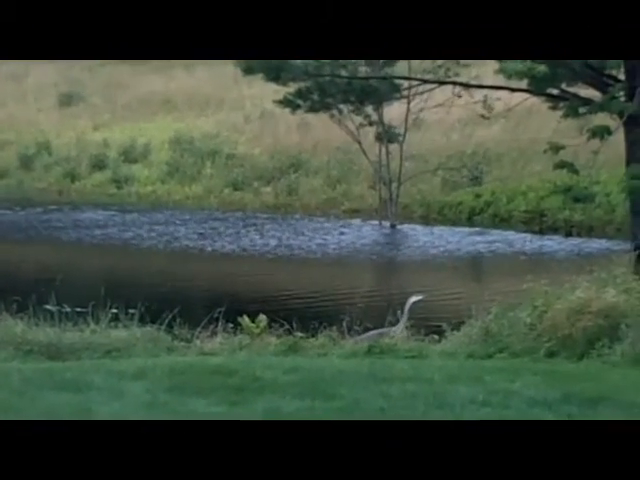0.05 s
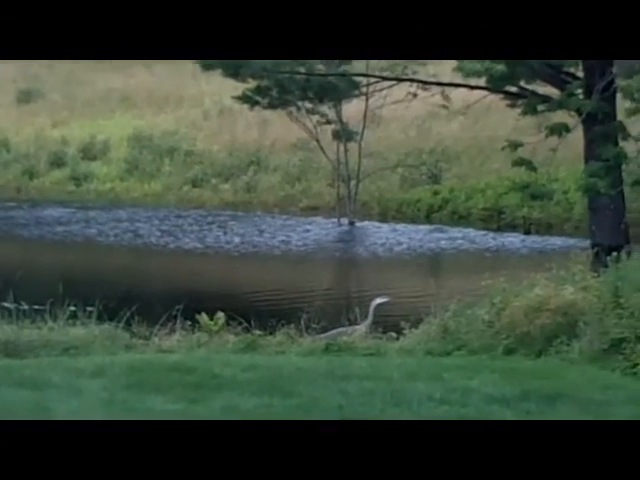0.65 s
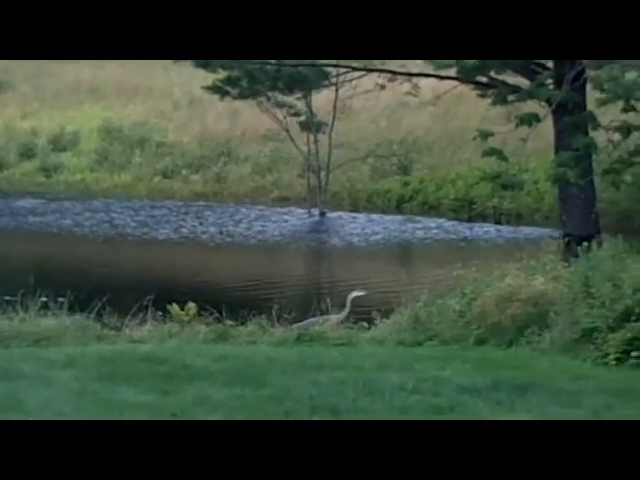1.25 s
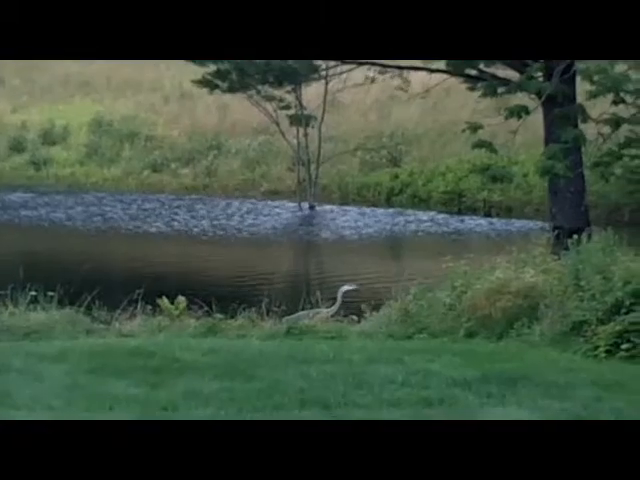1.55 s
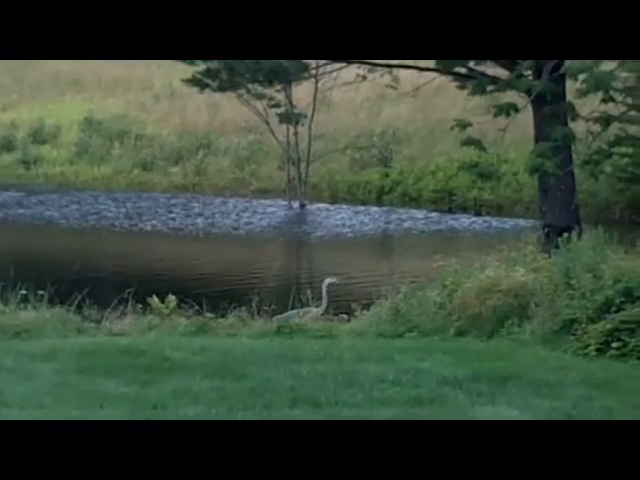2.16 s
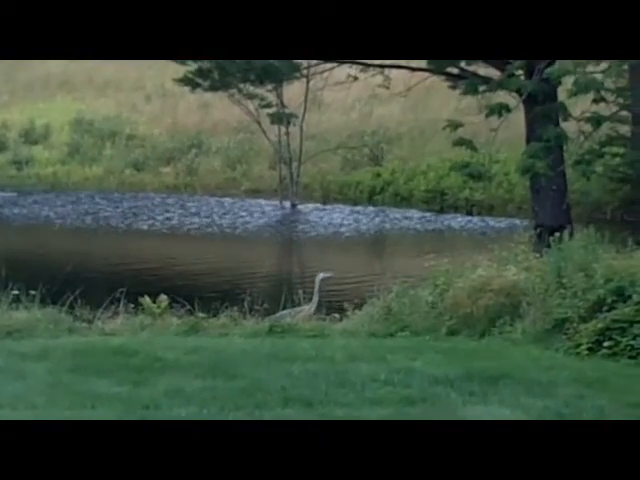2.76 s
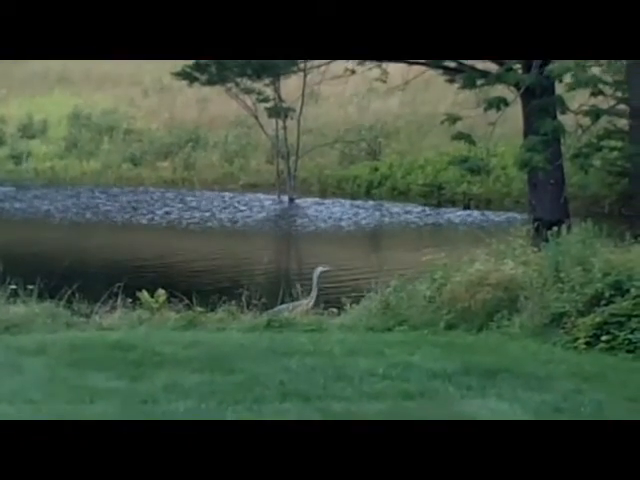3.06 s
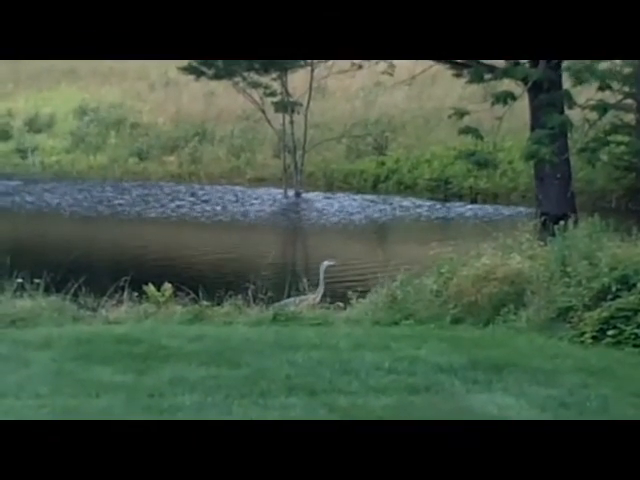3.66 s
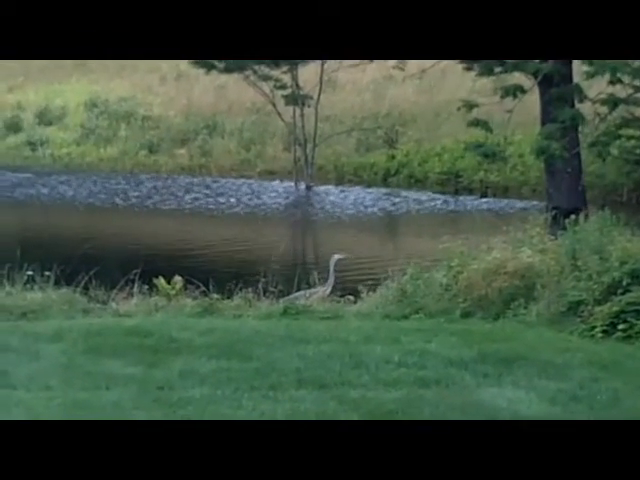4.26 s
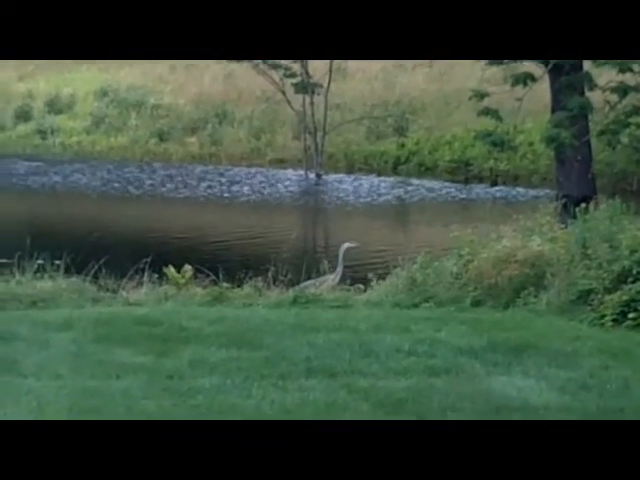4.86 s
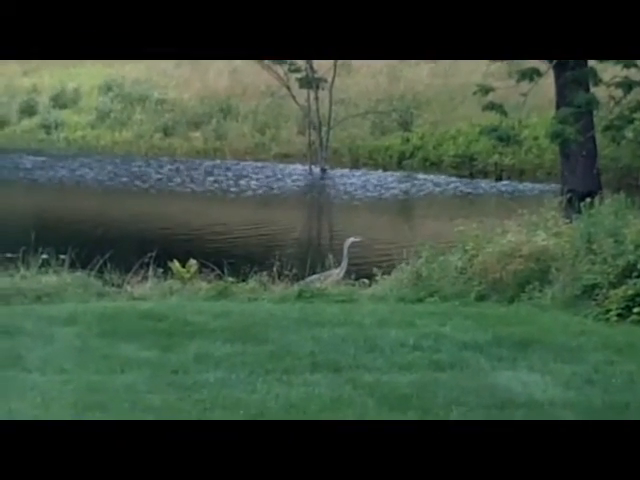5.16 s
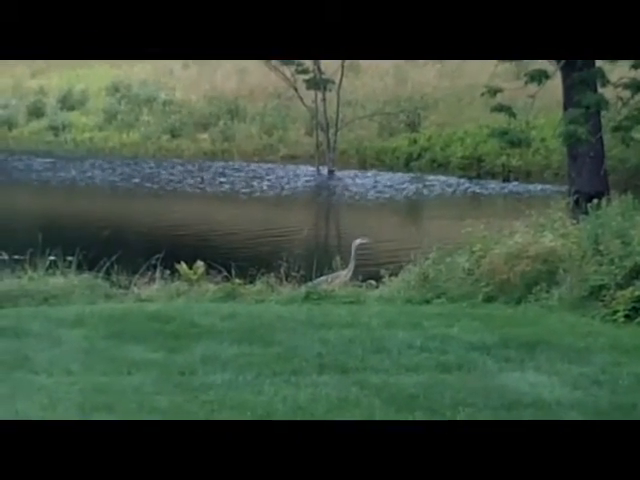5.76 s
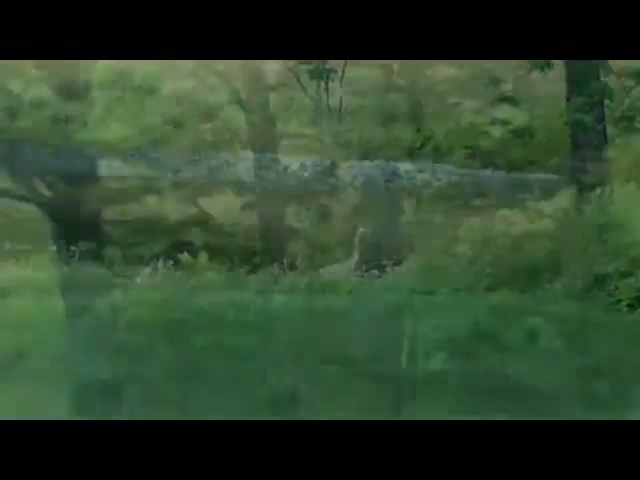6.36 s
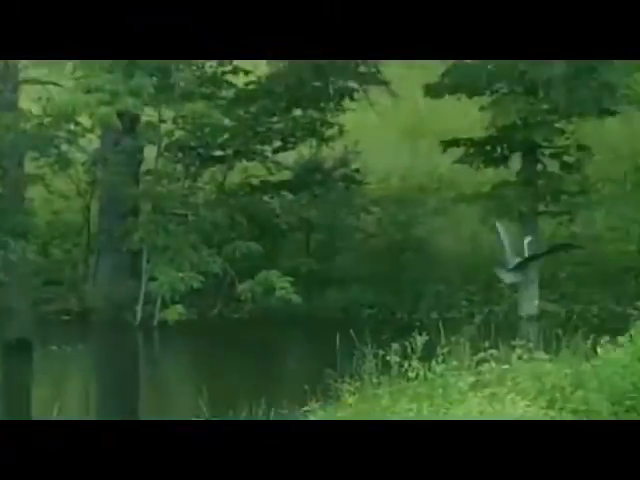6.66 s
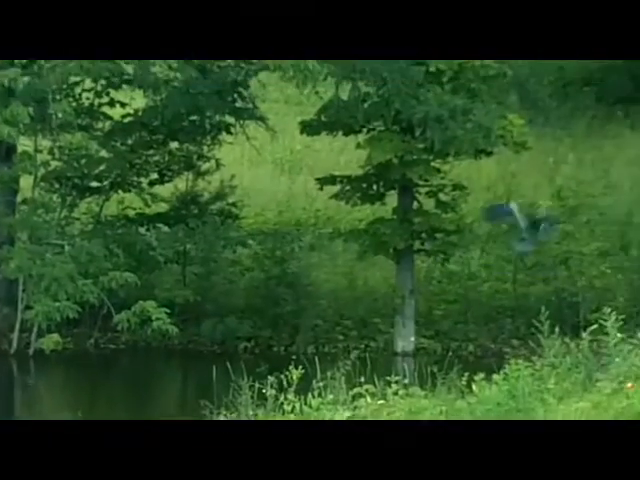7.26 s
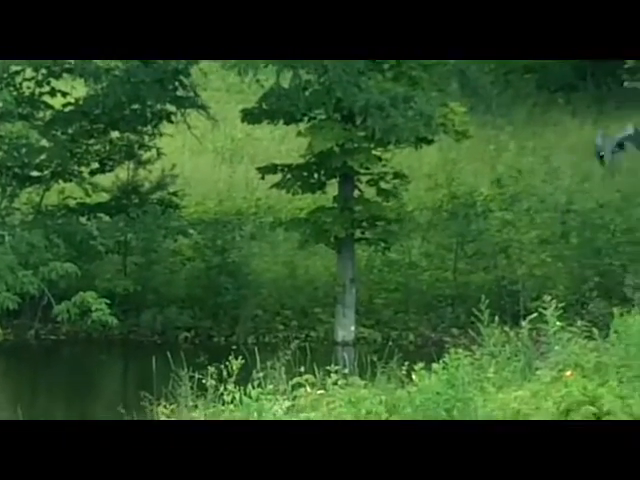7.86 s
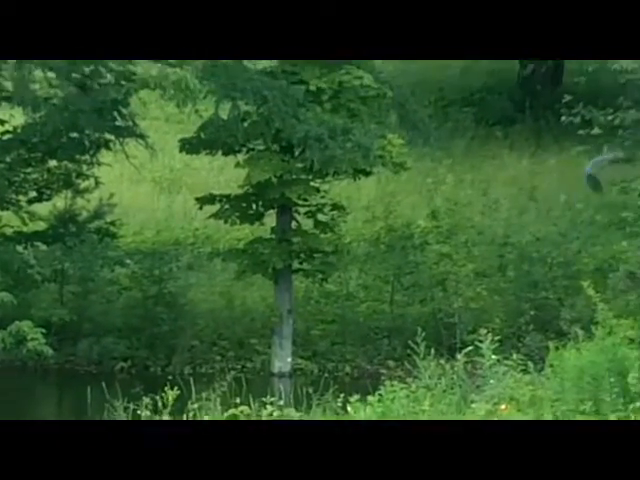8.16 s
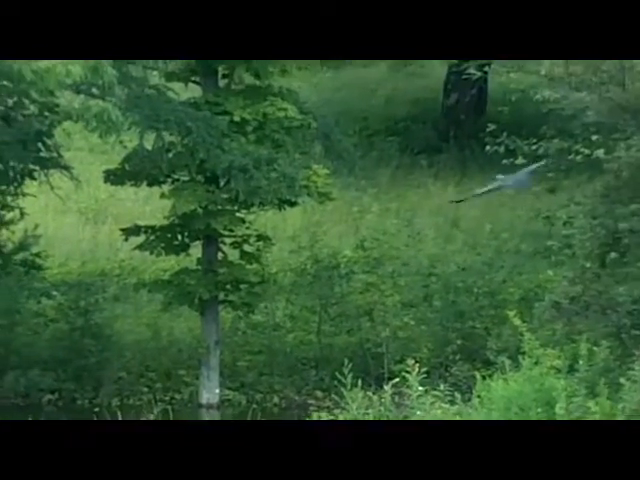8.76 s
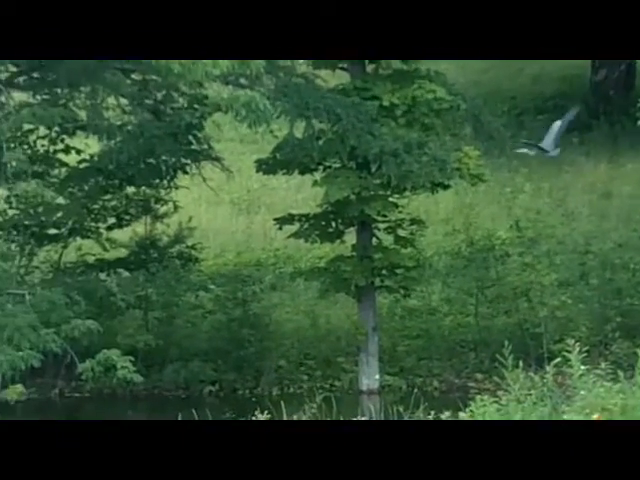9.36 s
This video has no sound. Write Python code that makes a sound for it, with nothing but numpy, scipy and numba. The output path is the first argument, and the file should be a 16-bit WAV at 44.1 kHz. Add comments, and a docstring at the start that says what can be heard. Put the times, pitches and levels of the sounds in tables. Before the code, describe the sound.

Soft outdoor hiss and the low hum of far traffic hang over a pond, with a thin camera whine underneath. A distant little bird sings one short, gliding phrase. Later the calm gives way to much louder wind buffeting the microphone. A hand bumps and knocks the camera, sharp clicks pop, and the hardest thumps briefly crackle and buzz, while a bird chirps faintly three times.

```python
"""Beside a pond, on a camera's microphone: quiet open air, a far road droning, and the camera's own faint whine
once per frame. Two seconds in, a small songbird whistles one phrase from the trees across the water. At 6.4 s a
second, windy scene comes in, overlapping the calm one for a moment. Wind rumbles right on the microphone and
handling adds thumps and knocks; the signal jumps in a few sharp clicks, and three faint falling chirps come
through the wind. On strong thumps the overloaded microphone crackles and buzzes; the heaviest make the limiter
duck."""
import sys
import numpy as np
from scipy import signal
from scipy.fft import rfft, irfft
from scipy.io import wavfile
from scipy.ndimage import uniform_filter1d, minimum_filter1d
from numba import njit

SR = 44100
rng = np.random.default_rng(int(sys.argv[2]) if len(sys.argv) > 2 else 0)


def to_wav(sig):
    """Store sig (one row per channel, or 1-D mono) as 16-bit WAV at the path in sys.argv[1].

    Samples outside -1..1 are clipped; the rate is SR.
    """
    pcm = np.clip(np.atleast_2d(sig), -1, 1) * 32767
    pcm = np.round(pcm).astype(np.int16)
    wavfile.write(sys.argv[1], SR, pcm.T)  # frames by channels


N = 415422
T = np.arange(N) / SR
WINDY_START_S, CALM_END_S = 6.428, 7.255
FRAME_HZ, WHINE_S = 29.97, .0075

# open air at the pond, and the microphone's hiss: (frequency [Hz], level [dB per Hz])
OPEN_AIR = [(20, -79.5), (65, -73), (130, -78), (250, -81), (400, -83.5), (600, -85.5), (950, -86.5),
            (1400, -92.5), (2200, -91.5), (4000, -91), (4850, -93), (5200, -108), (7000, -125)]
MIC_HISS = [(1000, -107), (5000, -107), (5500, -110), (6400, -107), (7300, -112), (8500, -117),
            (10000, -114.5), (11500, -113.5), (15000, -115.5)]
# the camera's whine: (pitch [Hz], level [dB])
WHINE_TONES = [(9500, -64.5), (14985, -68)]
# the frame clock in each scene: (holds from [s], start of one frame [s])
CALM_FRAMES = [(0, .0183)]
WINDY_FRAMES = [(0, .003), (8.2576, .015)]
# hum of the far road: (frequency [Hz], width [Hz], level [dB])
ROAD_HUM = [(169.2, 17.3, -67.5), (235.1, 16.7, -63), (393.2, 21, -65)]
# single far vehicles: (crest time [s], half length [s], pitch [Hz], level [dB])
VEHICLES = [(0.954, 0.269, 245.6, -52), (1.093, 0.75, 130.2, -58.5), (.9, 0.62, 215.3, -60.5),
            (2.242, 0.285, 248.8, -56), (2.5, 0.39, 222.1, -59), (2.504, 0.49, 309.6, -62.5),
            (2.997, 0.48, 254.4, -63), (3.244, 0.63, 108.9, -57)]
# wind on the microphone: (time [s], level [dB])
WIND_STRENGTH = [(6.44, -34), (6.52, -39.5), (6.56, -25), (6.72, -22), (6.9, -20), (7.02, -18.5),
                 (7.13, -27.5), (7.3, -27.5), (7.44, -25.5), (7.64, -29.5), (7.82, -22.5), (7.98, -27),
                 (8.22, -20), (8.46, -24), (8.87, -24), (9.02, -26), (9.18, -29.5), (9.42, -24.5)]
# colours of its large and small eddies: (frequency [Hz], relative level [dB])
WIND_RUMBLE = [(8, -14), (24, 8.5), (45, 6), (70, 1), (110, 0), (160, -13.5), (220, -33), (400, -53),
               (4000, -130)]
WIND_FLUTTER = [(90, -14), (160, 5), (240, -2), (330, -9), (450, -18), (700, -31), (1200, -52),
                (5000, -100)]
# short gusts that shake the camera: (crest time [s], half length [s], level [dB])
GUSTS = [(6.725, 0.034, -31), (7.031, 0.022, -37.5), (7.229, 0.0196, -34.5), (7.441, 0.00985, -28),
         (7.781, .014, -22.5), (8.036, 0.0067, -23.5), (8.195, 0.0254, -19.5), (8.239, 0.0169, -17.5),
         (8.293, 0.00385, -8), (8.34, 0.0416, -26.5), (8.894, 0.0468, -27.5), (9.256, 0.0092, -23)]
# soft thumps of the hand on the camera: (time [s], level [dB], half length [s])
HAND_THUMPS = [(6.745, -8.5, 0.00683), (6.887, -12, 0.00556), (7.821, -9, 0.0142), (8.106, -13.5, 0.008),
               (8.232, 1.5, 0.00516), (8.301, 2.5, 0.00395), (8.608, -13, 0.00452), (8.815, -10.5, 0.0058),
               (9.255, -12, 0.00506)]
# hard knocks on the case: (time [s], level [dB], roll-off of the contact [Hz])
CASE_KNOCKS = [(8.2275, -12, 478), (8.2976, -11.5, 1300), (9.256, -19.5, 448)]
# the case's resonances: (pitch [Hz], relative level [dB], half length [s])
CASE_MODES = [(242, 1.5, 0.00367), (426, -4.5, 0.00165), (779, 0, 0.0015)]
# brief dry crackles of the overloaded microphone on strong thumps: (time [s], level [dB])
OVERLOAD_TICKS = [(6.745, -42), (7.822, -40.5), (8.202, -45.5), (8.816, -45.5)]
# their colour: (frequency [Hz], relative level [dB])
TICK_COLOUR = [(300, -18), (700, 9.5), (2300, 7), (4800, -1.5), (6500, -45), (15000, -23.5)]
# buzz of the overloaded microphone: (frequency [Hz], width [Hz], relative level [dB])
BUZZ_BANDS = [(1700, 620, 1.5), (2260, 130, 6), (4740, 200, 4), (7180, 160, -15.5), (10370, 160, -16.5),
              (11960, 160, -9.5), (14400, 160, -14)]
# sharp jumps in the signal: (time [s], level [dB])
CLICKS = [(6.4283, -32), (6.6576, -13.5), (8.2576, -8.5)]
# notches in the microphone's response: (frequency [Hz], width [Hz])
MIC_NOTCHES = [(2720, 1154), (7850, 1930), (10900, 758)]
# the bird's syllables: (time into the syllable [s], pitch [Hz], relative level [dB])
DIP = [(0, 5235, -8), (.012, 4850, 0), (0.027, 4430, 5.5), (0.042, 4280, -1), (0.056, 4660, -1),
       (.068, 4898, 0), (.08, 4874, -10)]
ARCH = [(0, 3300, -20.5), (.015, 3850, -3.5), (0.027, 4350, 0.5), (0.039, 4600, -4.5), (.055, 4200, -3),
        (.07, 3800, -6), (0.089, 3300, -15)]
SWEEP = [(0, 2841, -7), (.03, 3083, -4.5), (.06, 3255, 1.5), (.078, 3420, -5), (.09, 3867, 2.5),
         (.1, 4270, 6), (.118, 5250, -12), (0.127, 4876, -3), (.145, 4894, -6.5)]
PEEP = [(0, 4828, -13), (.014, 4400, -5), (.024, 4360, -6), (.04, 4850, -17.5), (.055, 4880, -16.5)]
CHIP = [(0, 5132, -5), (.007, 4565, -5.5), (.016, 4150, -0.5), (.034, 3650, -2.5), (.06, 3140, -9.5)]
# the phrase from across the pond, and single chirps in the wind: (time [s], syllable, level [dB])
SONG = [(2.128, PEEP, -48), (2.217, ARCH, -52.5), (2.347, SWEEP, -53), (2.570, DIP, -52),
        (2.666, ARCH, -47.5), (2.803, SWEEP, -50), (3.017, DIP, -51), (3.112, ARCH, -45.5),
        (3.262, SWEEP, -54.5)]
CHIRPS = [(7.578, CHIP, -57.5), (7.704, CHIP, -58), (8.647, CHIP, -50.5)]


def undb(db):
    """Decibels to gain."""
    return 10 ** (np.asarray(db) / 20)


def unit(x):
    """Scale to rms 1."""
    return x / np.sqrt(np.mean(x ** 2))


def noise(points):
    """Noise with a spectrum of (frequency [Hz], level [dB per Hz]) points."""
    hz, db = np.transpose(points)
    f = np.maximum(np.fft.rfftfreq(N, 1 / SR), 1)
    colour = undb(np.interp(np.log(f), np.log(hz), db))
    return irfft(rfft(rng.standard_normal(N)) * colour, N) * np.sqrt(SR / 2)


def band(hz, width_hz):
    """Noise in one resonance with steep skirts, rms 1."""
    f = np.fft.rfftfreq(N, 1 / SR)
    return unit(irfft(rfft(rng.standard_normal(N)) / (1 + ((f - hz) / width_hz) ** 2) ** 2, N))


def walk(rate_hz):
    """Random values joined by straight lines; spread near 1."""
    steps = T * rate_hz
    count = int(steps[-1]) + 2
    return np.sqrt(3 / 2) * np.interp(steps, np.arange(count), rng.standard_normal(count))


def even(x, span_s):
    """Hold a noise near rms 1 over spans of the given length."""
    size = max(int(span_s * SR), 1)
    return x / np.sqrt(uniform_filter1d(uniform_filter1d(x ** 2, size), size) + 1e-12)


def swell(s, half_s):
    """A smooth rise and fall about a crest, height 1."""
    return np.exp(-np.minimum(((T - s) / half_s) ** 2, 50))


def open_air(level_db, sway_db=-0.28):
    """The quiet hiss of the outdoors, all round the microphone and barely swaying."""
    return noise(OPEN_AIR) * undb(level_db + sway_db * walk(0.51))


def camera_whine(frames, hiss_lift_db=4.0):
    """The camera's own noise: hiss, with a short burst of whine and extra hiss in every frame."""
    starts, offsets = np.transpose(frames)
    since_frame = (T - offsets[np.searchsorted(starts, T, "right") - 1]) % (1 / FRAME_HZ)
    burst = uniform_filter1d((since_frame < WHINE_S) * 1., size=50)
    whine = sum(undb(db) * np.sin(2 * np.pi * hz * T + .8 * walk(90)) for hz, db in WHINE_TONES)
    return noise(MIC_HISS) * undb(hiss_lift_db * burst) + burst * whine


def far_road(wander=0.00763, flutter_db=2.46, hum_sway_db=1.5, fade_db_per_s=0.36):
    """A far road hums and slowly fades; single vehicles swell over it in low, wandering tones."""
    traffic = sum(band(hz, width_hz) * undb(db + hum_sway_db * walk(2.826) - fade_db_per_s * T)
                  for hz, width_hz, db in ROAD_HUM)
    for s, half_s, hz, db in VEHICLES:
        phase = 2 * np.pi * np.cumsum(hz * (1 + wander * walk(6))) / SR
        traffic += np.sqrt(2) * np.sin(phase) * swell(s, half_s) * undb(db + flutter_db * walk(7.03))
    return traffic


def wind(rumble_db=-1, flutter_db=-36, flutter_growth=1.314, full_wind_db=-19, case_hz=151.72):
    """Large eddies rumble on the microphone, small ones flutter; gusts add flutter and shake the case."""
    strength_db = np.interp(T, *np.transpose(WIND_STRENGTH))
    eddies = walk(rate_hz=36)
    rumble = even(noise(WIND_RUMBLE), 0.067) * undb(strength_db + rumble_db + 3.0 * eddies)
    # as the wind rises, the flutter grows faster than the rumble
    flutter_gain = undb(flutter_db + flutter_growth * (strength_db - full_wind_db) - 0.5 * eddies)
    gusts = sum(undb(db) * swell(s, half_s) for s, half_s, db in GUSTS)
    flutter = even(noise(WIND_FLUTTER), 0.03) * np.hypot(flutter_gain, undb(-3) * gusts)
    shudder_hz = case_hz * (1 + .08 * walk(60))
    shudder = unit(np.sin(2 * np.pi * np.cumsum(shudder_hz) / SR))
    return rumble + flutter + undb(-2) * gusts * shudder


def hand_thumps(rebound=1.204):
    """The hand on the camera: each thump is one push of pressure with a shallow rebound either side."""
    return sum(undb(db) * swell(s, half_s) * (1 - rebound * ((T - s) / half_s) ** 2)
               for s, db, half_s in HAND_THUMPS)


def case_knocks():
    """A knock rings each mode of the case for a cycle or two; a softer contact loses the higher ones."""
    knocks = np.zeros(N)
    for s, db, rolloff_hz in CASE_KNOCKS:
        for hz, mode_db, half_s in CASE_MODES:
            gain = np.sqrt(2) * undb(db + mode_db) * np.exp(-(hz / rolloff_hz) ** 2)
            knocks += gain * swell(s, half_s) * np.sin(2 * np.pi * hz * (T - s))
    return knocks


def overload_ticks(half_s=0.00124):
    """Brief dry crackles of the overloaded microphone: bursts of noise placed on strong thumps."""
    return even(noise(TICK_COLOUR), .004) * sum(undb(db) * swell(s, half_s) for s, db in OVERLOAD_TICKS)


def overload_buzz(pressure, limit=0.291, knee=0.975, level_db=-41):
    """The strongest swings overload the microphone, which buzzes briefly."""
    overload = np.tanh(np.maximum(np.abs(pressure) - limit, 0) / knee)
    buzz = sum(undb(db) * even(band(hz, width_hz), 0.0082) for hz, width_hz, db in BUZZ_BANDS)
    return undb(level_db) * overload * buzz


def clicks(settle_s=0.002):
    """Sharp clicks: the signal jumps and settles."""
    return sum(undb(db) * (T >= s) * np.exp(-np.abs(T - s) / settle_s) for s, db in CLICKS)


def scatter(x, t60_s):
    """Dense reflections from the trees, dying away, with about the energy of the sound itself."""
    tail = rng.standard_normal(SR) * np.exp(-np.log(1000) * T[:SR] / t60_s)
    return signal.fftconvolve(x, tail / np.linalg.norm(tail))[:N]


def songbird(notes, leaves_db, woods_db, waver=.013, flutter_db=2.0):
    """A whistle off in the trees glides through each syllable; leaves blur it, the woods add a tail."""
    voice = np.zeros(N)
    drift, flutter = 1 + waver * walk(150), flutter_db * walk(99)
    for start, syllable, level_db in notes:
        s, hz, db = np.transpose(syllable)
        span = np.flatnonzero((T >= start) & (T < start + s[-1]))
        t = T[span] - start
        phase = 2 * np.pi * np.cumsum(np.interp(t, s, hz) * drift[span]) / SR
        envelope = undb(level_db + np.interp(t, s, db) + flutter[span])
        voice[span] += np.sin(phase) * envelope * signal.windows.tukey(len(span), .1)
    leaves = undb(leaves_db) * scatter(voice, t60_s=0.298)
    woods = undb(woods_db) * scatter(voice, t60_s=0.69)
    return voice + leaves + woods


def microphone(x):
    """The camera's microphone cuts three notches into the treble."""
    for hz, width_hz in MIC_NOTCHES:
        x = signal.lfilter(*signal.iirnotch(hz, hz / width_hz, fs=SR), x)
    return x


@njit
def follow(x, attack, release):
    """An envelope that rises fast and falls slowly."""
    envelope, level = np.empty(len(x)), 0.
    for i in range(len(x)):
        level += (x[i] - level) * (attack if x[i] > level else release)
        envelope[i] = level
    return envelope


def limiter(x, ceiling=0.673, attack_s=.0001, release_s=0.091):
    """The camera turns down for the heaviest thumps, so the hiss ducks briefly after them."""
    envelope = follow(np.abs(x), 1 / (attack_s * SR), 1 / (release_s * SR))
    gain = minimum_filter1d(ceiling / np.maximum(envelope, ceiling), size=300)
    return x * uniform_filter1d(uniform_filter1d(gain, size=150), size=150)


def scene():
    """On one microphone: the calm pond with the song, overlapped and followed by the windy scene."""
    calm = open_air(level_db=0) + camera_whine(CALM_FRAMES) + far_road()
    calm += songbird(SONG, leaves_db=3.0, woods_db=-5.5)
    buffeting = wind() + hand_thumps() + case_knocks() + overload_ticks()
    windy = open_air(level_db=-1.0) + camera_whine(WINDY_FRAMES) + buffeting
    windy += songbird(CHIRPS, leaves_db=-7.5, woods_db=-9.5)
    both = calm * (T < CALM_END_S) + windy * (T >= WINDY_START_S)
    return (microphone(both) + overload_buzz(buffeting) + clicks())[None]


def record(dry, top_hz=15400):
    """The camera limits the peaks and cuts the top steeply."""
    lowpass = signal.ellip(8, .2, 70, top_hz, fs=SR, output="sos")
    return signal.sosfilt(lowpass, limiter(dry[0]))[None]


dry = scene()
out = record(dry)
to_wav(out)
```